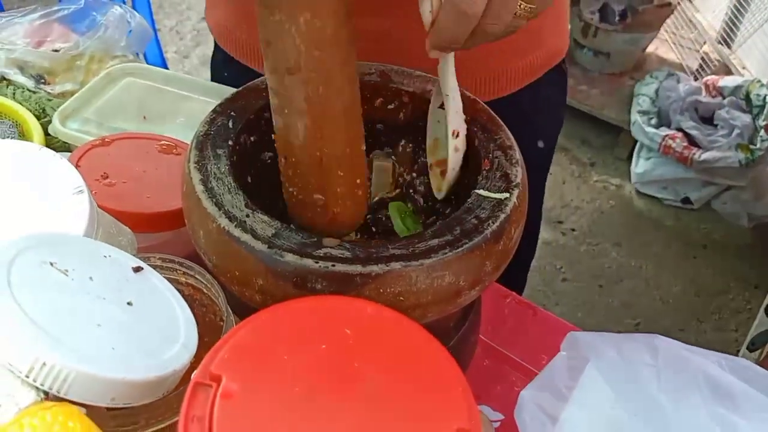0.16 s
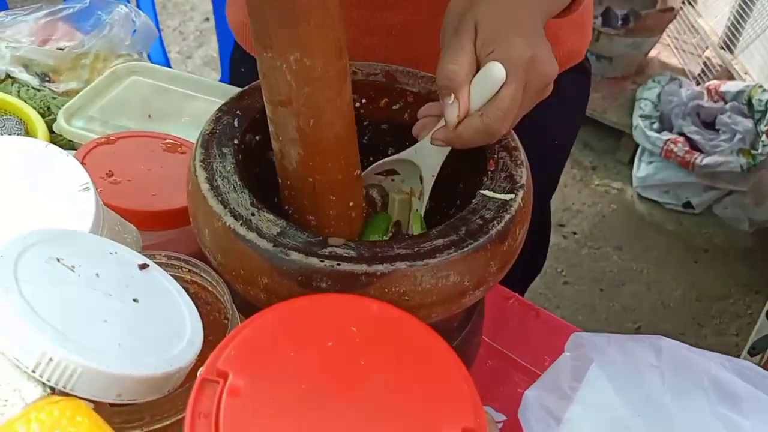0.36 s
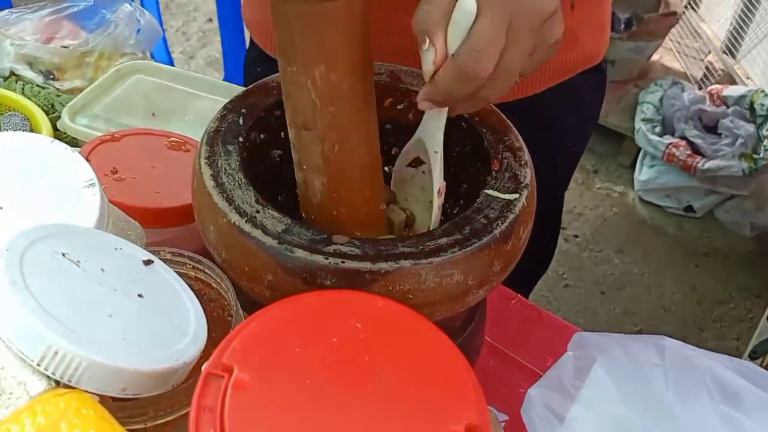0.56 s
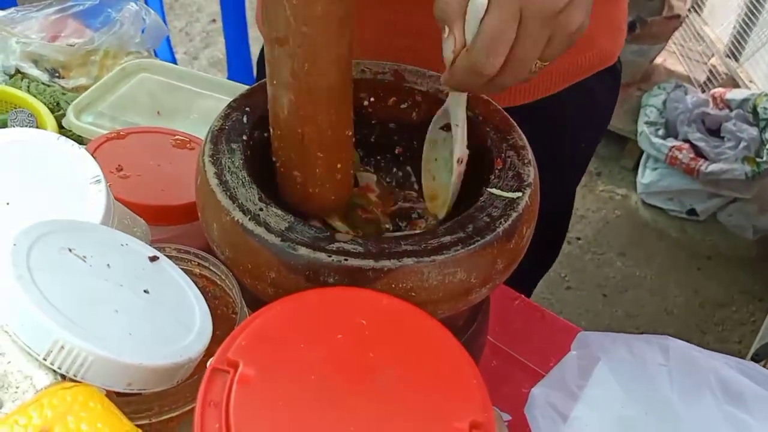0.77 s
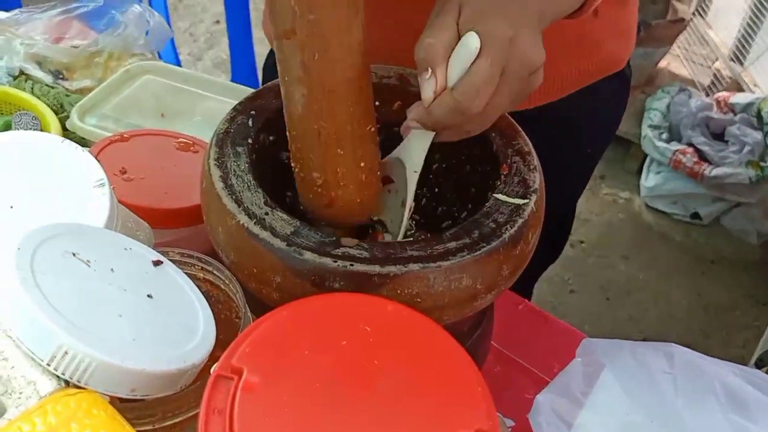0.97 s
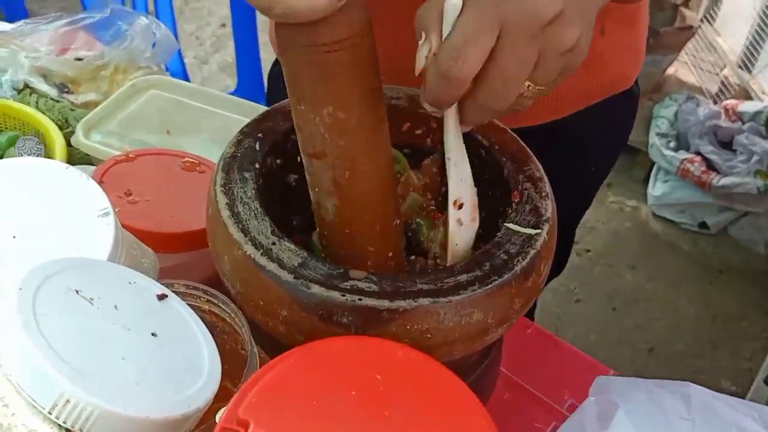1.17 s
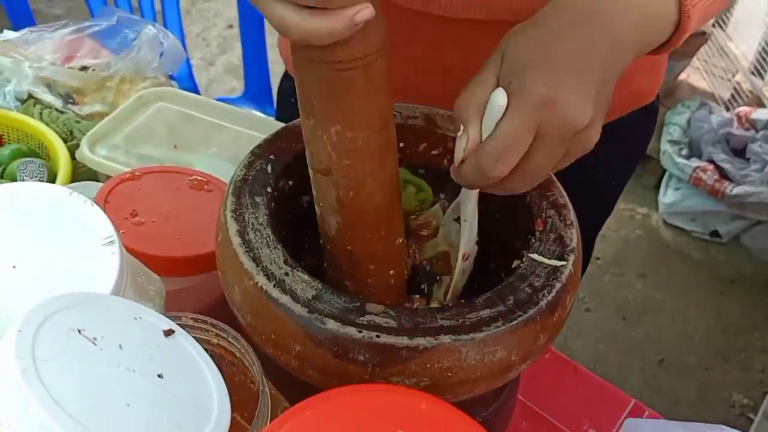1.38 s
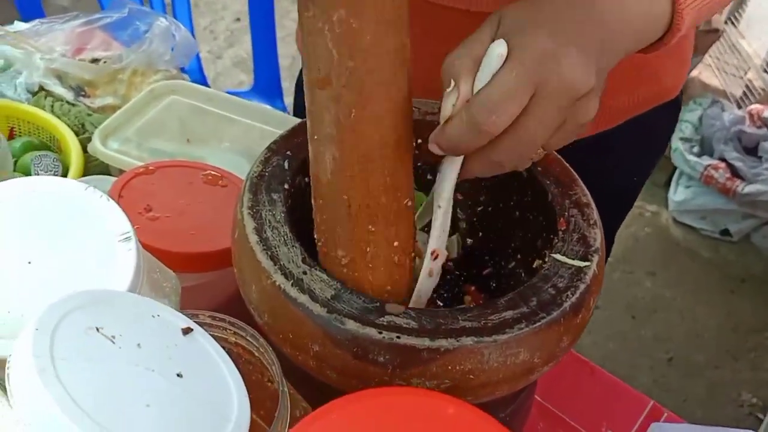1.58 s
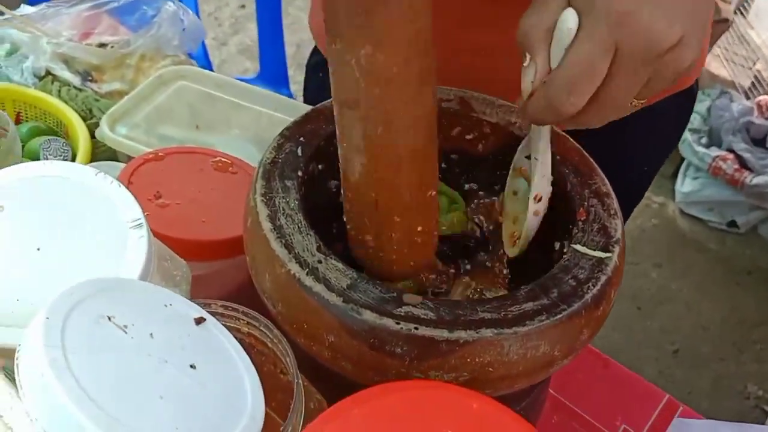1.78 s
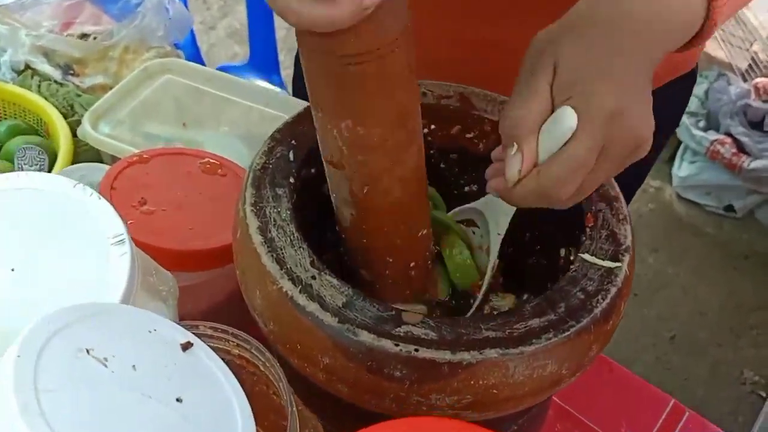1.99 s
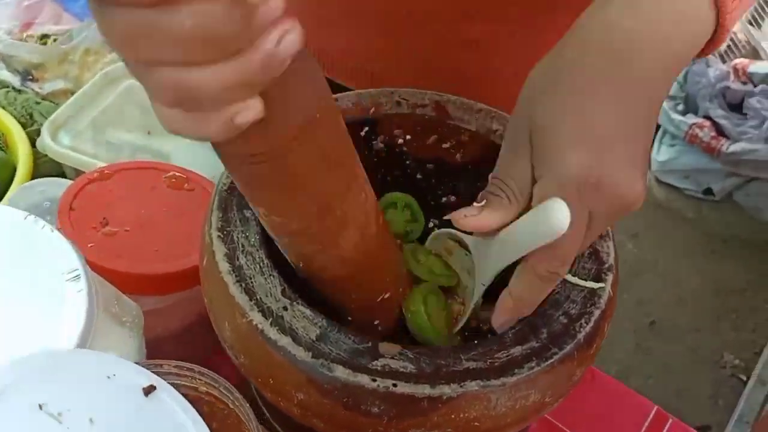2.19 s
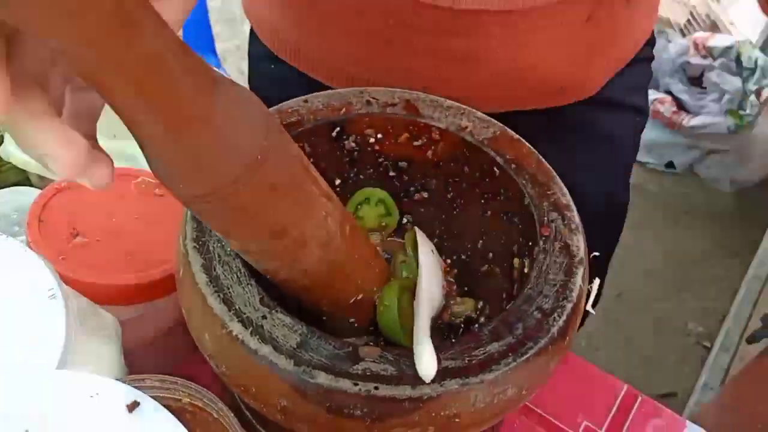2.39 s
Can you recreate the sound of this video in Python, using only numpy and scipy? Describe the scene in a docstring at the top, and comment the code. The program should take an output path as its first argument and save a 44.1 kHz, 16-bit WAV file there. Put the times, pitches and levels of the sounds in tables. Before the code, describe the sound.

Close, fairly dry pounding of wet vegetables in a clay mortar, hard and soft blows mixed, with squishy crackle after them, spoon scrapes and knocks between, ending on spoon sounds over low distant traffic.

```python
"""Outdoor stall over a low street rumble: a wooden pestle pounds wet vegetables in a clay mortar, close up.
First a blow rings the damped bowl as decaying sines, over noise-burst slap and thud; hard and soft blows mix.
Then the mash squelches (ringing grains and crackle) and air pockets pop (short sine and click).
Between blows a plastic spoon scrapes (grains and crackle), ticks (noise bursts) and knocks (decaying sines).
After the last blow the mash still squelches, the spoon scrapes once more and knocks near the end."""
import sys
import numpy as np
from scipy import signal
from scipy.fft import rfft, irfft, next_fast_len
from scipy.io import wavfile
from scipy.ndimage import map_coordinates

SR = 44100
rng = np.random.default_rng(int(sys.argv[2]) if len(sys.argv) > 2 else 0)


def put_to_file(sound):
    """Save the sound as 16-bit audio at rate SR, in the file named by the first command-line argument."""
    columns = np.atleast_2d(sound).T  # one column per channel
    safe = np.clip(columns, -1, 1)
    whole_steps = np.round(safe * 32767)
    wavfile.write(sys.argv[1], SR, whole_steps.astype(np.int16))


N = 108045


def amp(db):
    """Amplitude factor of a level in dB."""
    return 10 ** (np.asarray(db) / 20)


def unit(x):
    """x at rms 1."""
    return x / np.sqrt(np.mean(x ** 2) + 1e-20)


def along(points, hz):
    """Interpolate (Hz, value) points on a log frequency axis."""
    f, v = np.transpose(points)
    return np.interp(np.log(hz + 1), np.log(f + 1), v)


def split(difference):
    """Half of a left-right difference for each ear."""
    return np.array([[.5], [-.5]]) * difference


def filtered(x, response):
    """x times a response of frequency."""
    n = x.shape[-1]
    m = next_fast_len(n + 4096)
    return irfft(rfft(x, m) * response(np.fft.rfftfreq(m, 1 / SR)), m)[..., :n]


def coloured(x, spectrum):
    """x shaped by a (Hz, dB) spectrum, at rms 1."""
    return unit(filtered(x, lambda hz: amp(along(spectrum, hz))))


def balanced(x, balance):
    """x with a (Hz, left-right dB) balance between the ears."""
    return filtered(x, lambda hz: amp(split(along(balance, hz))))


def add(out, s, x):
    """Mix x in at time s."""
    i = max(0, round(s * SR))
    out[:, i:i + x.shape[1]] += x[:, :max(0, N - i)]


def decay(t, t60):
    """Exponential fall by a factor of 1000 in t60."""
    return np.exp(-np.log(1000) * t / t60)


def ring(modes, attack_s):
    """Damped modes of alternating sign, as both ears hear them."""
    t = np.arange(SR // 10) / SR
    total = np.zeros((2, len(t)))
    for k, (hz, db, t60, pan, lead) in enumerate(modes):
        wave = np.sin(2 * np.pi * hz * t + split(lead))
        total += (-1) ** k * amp(db + split(pan)) * decay(t, t60) * wave
    return (1 - np.exp(-t / attack_s)) * total


def snap(spectrum, t60, attack_s=0.00032):
    """A short burst of coloured noise."""
    t = np.arange(SR // 10) / SR
    noise = coloured(rng.standard_normal((2, len(t))), spectrum)
    return noise * decay(t, t60) * (1 - np.exp(-t / attack_s))


# Pestle blows. Each row: start in seconds, level in dB, modes above the upper band in dB,
# upper band in dB, left-right of the main mode in dB, wet slap in dB, dull thud in dB,
# table thump in dB, attack time constant in seconds, ring length factor.
BLOWS = [(0.0572, -16, -5, -11, -1.5, -45.5, -23, -44, 0.0012, 1.14),
         (0.3203, -10.5, -2.5, -0.5, 7, -27.5, -29, -44, 0.0032, 1),
         (.3672, -24.5, -12, -5, 8, -54, -36.5, -38, 0.0019, 0.94),
         (0.611, -25.5, -5.5, -6, -3, -43.5, -36, -61, 0.0013, 1.1),
         (.8440, -11, -9.5, -2, 5, -35, -26, -34, 0.004, 0.85),
         (1.3813, -9.5, -14, -0.5, 3, -41, -31, -41, 0.0041, 0.82),
         (1.6790, -21, -13, -24, -6.5, -38, -29, -32.5, 0.0017, 1.12),
         (1.949, -9, -5, -5, -2.5, -38.5, -29.5, -46, 0.0034, 0.88)]
# Filled mortar. Each row: mode in Hz, level in dB, t60 in seconds before the blow's length factor,
# left-right in dB, left lead in radians.
MORTAR_MODES = [(515, -29, 0.033, 29, 0.5), (649, -11, 0.045, 6, -0.3), (793.4, 0, 0.071, 2, -0.43),
                (1016, -8.5, 0.027, -4, -2.6), (1333, -4, 0.051, -9.5, 1.43), (1424, -16, 0.11, -4, 1.6),
                (1856, -13.5, 0.064, 8.5, -0.2), (2081, -6, 0.044, -0.5, 1.07),
                (2304, -4.5, 0.023, -7, 2.5), (2906, -3.5, 0.019, 2, 2.5)]
# Mash taking the blow. Each row: frequency in Hz, level in dB.
THUD_SPECTRUM = [(100, 6), (380, -15.5), (640, 3.5), (1000, -2.5), (1500, -15), (2300, -18.5), (3300, -37),
                 (6000, -46)]
# Stereo balance of the mash. Each row: frequency in Hz, left-right in dB.
MASH_BALANCE = [(600, -5), (1300, -8.5), (2200, -10), (4500, 3.5)]
# Spoon and wet slap colour. Each row: frequency in Hz, level in dB.
SPOON_SPECTRUM = [(300, -30.5), (1000, -12.5), (2900, 0.5), (3500, -3), (4200, 0.5), (5200, 3.5),
                  (6600, -13), (9500, -22), (12000, -18), (15500, -27)]
MAIN_BAND_HZ, UPPER_BAND_HZ = (720, 880), (1200, 1550)
SLAP_T60_S, THUD_T60_S = 0.021, 0.054
THUMP_HZ, THUMP_T60_S, THUMP_ATTACK_S = 176, .05, 0.00067  # table under the mortar


def pestle():
    """Each blow rings the mortar, thuds in the mash, thumps the table and slaps; mode mix and ring length vary."""
    out = np.zeros((2, N))
    thump = ring([(THUMP_HZ, 0, THUMP_T60_S, 0, 0)], THUMP_ATTACK_S)
    for s, db, top_db, upper_db, main_pan_db, slap_db, thud_db, thump_db, attack_s, length in BLOWS:
        modes = []
        for hz, level_db, t60_s, pan_db, lead_rad in MORTAR_MODES:
            level_db += top_db * (hz > UPPER_BAND_HZ[1])
            level_db += upper_db * (UPPER_BAND_HZ[0] < hz < UPPER_BAND_HZ[1])
            pan_db += main_pan_db * (MAIN_BAND_HZ[0] < hz < MAIN_BAND_HZ[1])
            modes.append((hz, level_db, t60_s * length, pan_db, lead_rad))
        thud = balanced(snap(THUD_SPECTRUM, THUD_T60_S)[0], MASH_BALANCE)
        add(out, s, amp(db) * ring(modes, attack_s))
        add(out, s, amp(thump_db) * thump)
        add(out, s, amp(thud_db) * thud)
        add(out, s, amp(slap_db) * snap(SPOON_SPECTRUM, SLAP_T60_S))
    return out


LEAD_S, LEAD_SCATTER_S = .00012, .00005  # mash is heard first on the left
SQUISH_HZ, SQUISH_LOG_SPREAD, SQUISH_PITCH_LIMIT = 1640, 0.5295, 1.7  # limit in standard deviations
SQUISH_CYCLES, SQUISH_PER_S = 4.4, 1500  # cycles per e-fold


def squish(moving):
    """A swarm of small wet cavities, each ringing for a few cycles while the mash moves."""
    chance = rng.random(N)
    start = np.flatnonzero(moving & (chance < SQUISH_PER_S / SR))
    pitch, size, scatter = rng.standard_normal((3, len(start), 1))
    t = np.arange(SR // 100) / SR
    pitch = np.clip(pitch, -SQUISH_PITCH_LIMIT, SQUISH_PITCH_LIMIT)
    hz = SQUISH_HZ * np.exp(SQUISH_LOG_SPREAD * pitch)
    envelope = np.exp(-t * hz / SQUISH_CYCLES) * (1 - np.exp(-t * hz)) ** 2
    grains = amp(2.3 * np.minimum(size, 1.5)) * envelope
    at = (start[:, None] + np.arange(len(t))).ravel()
    lead = LEAD_S + LEAD_SCATTER_S * scatter
    pair = []
    for ear in (.5, -.5):
        wave = grains * np.sin(2 * np.pi * hz * (t + ear * lead))
        pair.append(np.bincount(at, wave.ravel(), N)[:N])
    return unit(balanced(np.array(pair), MASH_BALANCE)) * np.sqrt(moving.mean())


CRACKLE_T30_S = .0045  # fall by 30 dB
WALL_SCATTER = 4.4  # scattered over direct amplitude


def crackle(per_s, spike_db, spectrum):
    """Tiny noise clicks of uneven size, heard directly and scattered by the bowl."""
    sizes_db = spike_db * np.minimum(rng.exponential(size=N), 3)
    click_power = (rng.random(N) < per_s / SR) * amp(sizes_db) ** 2
    gate = np.sqrt(signal.lfilter([1], [1, -decay(1 / SR, CRACKLE_T30_S)], click_power))
    noise = gate * rng.standard_normal((3, N))
    direct = filtered(noise[0], lambda hz: np.exp(2j * np.pi * hz * split(LEAD_S)))
    return coloured(direct + WALL_SCATTER * noise[1:], spectrum)


def strokes(rows, per_s, spike_db, spectrum):
    """Mash on the move: squish and fine crackle swell and fade together."""
    t = np.arange(N) / SR
    swells = np.array([np.interp(t, [s, s + rise, s + rise + fall], [0, 1, 0])
                       for s, rise, fall, *_ in rows])
    squish_gain, crackle_gain = amp([row[3:] for row in rows]).T @ swells
    wet = squish_gain * squish(squish_gain > 0)
    return wet + crackle_gain * crackle(per_s, spike_db, spectrum)


# Mash squeezed by the pestle. Each row: start in seconds, rise in seconds, fall in seconds,
# squish in dB, fizz in dB.
SQUELCHES = [(.078, 0.038, 0.041, -35.5, -34.5), (.138, 0.013, 0.017, -38, -76),
             (.322, .055, 0.043, -38.5, -37.5), (.596, 0.033, 0.036, -41, -46),
             (.640, 0.037, 0.023, -40.5, -53.5), (.842, .025, .04, -41.5, -47),
             (.888, 0.026, 0.037, -38.5, -38), (1.378, 0.029, .035, -55, -40),
             (1.425, 0.031, 0.057, -39.5, -42), (1.48, 0.075, 0.16, -48.5, -62),
             (1.680, 0.053, 0.078, -40.5, -41.5), (1.992, 0.023, 0.04, -38.5, -39)]
# Fizz and pop click colour. Each row: frequency in Hz, level in dB.
FIZZ_SPECTRUM = [(300, -52), (1500, -3), (2700, 4.5), (3300, -7.5), (3900, -2.5), (5200, -6), (6500, -13.5),
                 (9500, -31), (12000, -27), (15500, -37.5)]
FIZZ_PER_S, FIZZ_SPIKE_DB = 550, 4.5


def squelches():
    """Squeezed mash: ringing cavities with a fizz of crackle."""
    return strokes(SQUELCHES, FIZZ_PER_S, FIZZ_SPIKE_DB, FIZZ_SPECTRUM)


# Air pockets bursting in the mash. Each row: start in seconds, pitch in Hz, level in dB.
POPS = [(0.099, 3910, -21), (0.1321, 5100, -23), (.1530, 2020, -23.5), (.3112, 2990, -26.5),
        (.3783, 5000, -21.5), (.3900, 2230, -27.5), (0.6242, 2760, -24.5), (0.8972, 2060, -21.5),
        (.9250, 2250, -29.5), (1.4432, 2490, -24.5), (1.4608, 3950, -19.5), (1.4925, 2020, -27),
        (1.7662, 2340, -31.5), (1.9924, 2500, -21), (2.0120, 2260, -32), (2.0185, 3160, -26)]
POP_CYCLES, POP_ATTACK_S, POP_LEAD_RAD = 33.3, 0.00036, 1.5  # cycles per t60, left leads
POP_CLICK_DB, POP_CLICK_T60_S = -12.5, 0.015  # relative to the pop


def pops():
    """Air pockets burst with a click and a brief ring."""
    out = np.zeros((2, N))
    for s, hz, db in POPS:
        mode = (hz, 0, POP_CYCLES / hz, along(MASH_BALANCE, hz), POP_LEAD_RAD)
        add(out, s, amp(db) * ring([mode], POP_ATTACK_S))
        add(out, s, amp(db + POP_CLICK_DB) * snap(FIZZ_SPECTRUM, POP_CLICK_T60_S))
    return out


# Spoon strokes through the mash. Each row: start in seconds, rise in seconds, fall in seconds,
# body in dB, hiss in dB.
SCRAPES = [(.220, .012, .012, -45, -38), (.280, 0.012, 0.08, -54, -46), (.820, 0.0075, 0.06, -72, -49.5),
           (1.135, 0.063, 0.03, -41, -43.5), (1.350, 0.031, 0.08, -47.5, -41),
           (1.808, 0.03, 0.052, -45.5, -41), (1.914, 0.0057, 0.032, -40.5, -42.5),
           (2.225, 0.026, 0.085, -44, -52.5)]
# Sharp spoon ticks. Each row: start in seconds, level in dB.
TICKS = [(0.2274, -41), (.2350, -40), (0.2837, -40), (0.749, -39), (0.775, -44), (0.832, -34),
         (.9365, -36.5), (1.001, -47.5), (1.3597, -34), (1.8136, -26.5), (1.8604, -27.5), (1.917, -38.5),
         (2.109, -50.5), (2.196, -49), (2.265, -41), (2.4304, -45.5)]
# Light knocks on the wall. Each row: start in seconds, level in dB, pitch factor.
KNOCKS = [(.604, -38, 0.94), (.910, -28, 0.91), (1.185, -24.5, 0.95), (1.191, -32, 1.05), (1.207, -24, 1.0),
          (1.212, -30, 0.97), (1.218, -31.5, 0.993), (2.358, -37.5, 0.74), (2.4313, -26, 0.99)]
# Knocking spoon. Each row: mode in Hz before the pitch factor, level in dB, t60 in seconds,
# left-right in dB, left lead in radians.
SPOON_MODES = [(699, -12, 0.04, 3, 0), (1010, -3, 0.027, -7.5, 0), (1256, -12, 0.04, -1.5, 1.1),
               (1560, 0, 0.013, -8, 1.6), (2187, 2, 0.012, -1.5, 1.96), (2800, -11, 0.016, 6, 1.9)]
SCRAPE_PER_S, SCRAPE_SPIKE_DB, TICK_T60_S = 700, 3.5, 0.022


def spoon():
    """The spoon scrapes (grains and crackle), ticks (noise) and knocks (modes) along the wall."""
    out = strokes(SCRAPES, SCRAPE_PER_S, SCRAPE_SPIKE_DB, SPOON_SPECTRUM)
    for s, db in TICKS:
        add(out, s, amp(db) * snap(SPOON_SPECTRUM, TICK_T60_S))
    for s, db, pitch in KNOCKS:
        modes = [(hz * pitch, *rest) for hz, *rest in SPOON_MODES]
        add(out, s, amp(db) * ring(modes, attack_s=0.00081))
    return out


def echo(x, t60s):
    """A diffuse tail in which each frequency dies at its own speed."""
    hz, t, z = signal.stft(rng.standard_normal((2, SR // 3)), SR, nperseg=128)
    fading = z * decay(t, along(t60s, hz)[:, None])
    tail = signal.istft(fading, SR, nperseg=128)[1]
    return signal.fftconvolve(x, tail / np.linalg.norm(tail[0]), axes=1)[:, :N]


# Street colour. Each row: frequency in Hz, level in dB.
STREET_SPECTRUM = [(15, -47), (25, -47), (61, -10), (119, 1), (169, -1.5), (233, -9), (289, -9.5),
                   (340, -16), (666, -12.5), (970, -20.5), (1240, -15), (1620, -17.5), (2490, -11),
                   (3440, -26), (5280, -26.5), (6550, -41), (9810, -53), (13500, -48.5), (15500, -61)]
# Street stereo width. Each row: frequency in Hz, left-right correlation.
STREET_ALIKE = [(40, 0.85), (170, 1), (400, 0.8), (800, 0.59), (1500, -0.14), (3000, -0.35), (8000, -0.042)]
STREET_DB, STREET_SWAY_DB = -47.5, 0.71


def street():
    """Distant traffic rumble and hiss: coloured noise, gently swaying in level."""
    def mid_side(hz):
        angle = np.arccos(np.clip(along(STREET_ALIKE, hz), -1, 1)) / 2
        return amp(along(STREET_SPECTRUM, hz)) * [np.cos(angle), np.sin(angle)]

    mid, side = filtered(rng.standard_normal((2, N)), mid_side)
    sway = map_coordinates(rng.standard_normal(N // 4000 + 4), [np.arange(N) / 4000])
    return amp(STREET_DB + STREET_SWAY_DB * sway) * unit(np.array([mid + side, mid - side]))


# Stall reverberation. Each row: frequency in Hz, t60 in seconds.
STALL_T60 = [(200, 0.12), (2000, 0.22), (10000, 0.22)]
STALL_DB, LOW_CUT_HZ = -14, 130


def scene():
    """Pestle, mash and spoon are close and lose their lowest bass; the stall answers faintly."""
    near = pestle() + squelches() + pops() + spoon()
    low_cut = signal.butter(3, LOW_CUT_HZ, "highpass", fs=SR, output="sos")
    near = signal.sosfilt(low_cut, near)
    return near + amp(STALL_DB) * echo(near, STALL_T60) + street()


TOP_HZ = 16000


def record(dry):
    """Nothing is kept above the band limit."""
    return filtered(dry, lambda hz: hz < TOP_HZ)


dry = scene()
out = record(dry)
put_to_file(out)
```